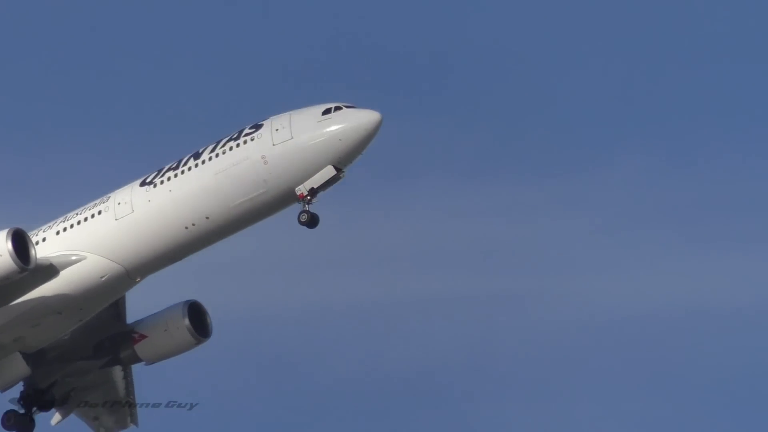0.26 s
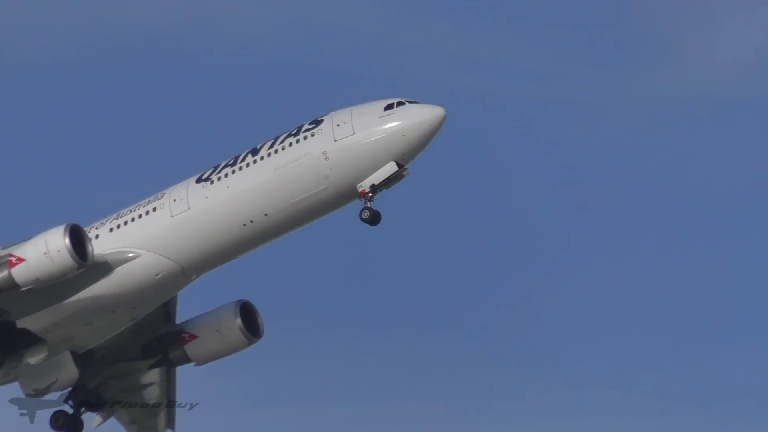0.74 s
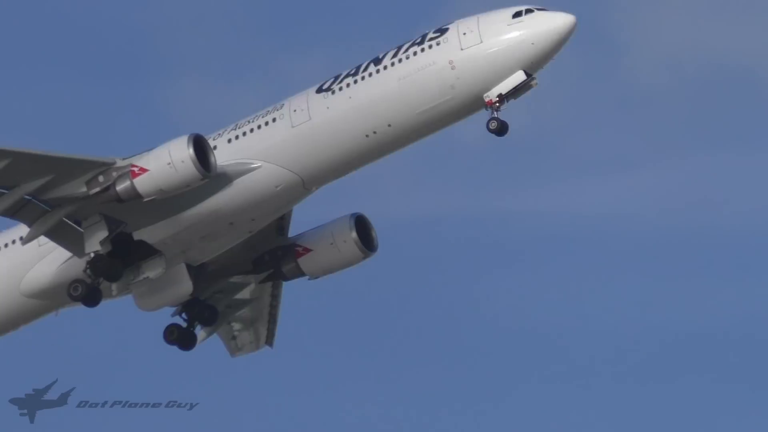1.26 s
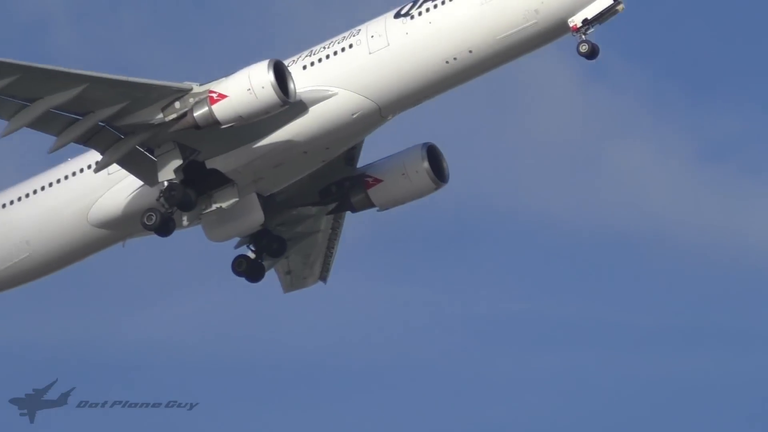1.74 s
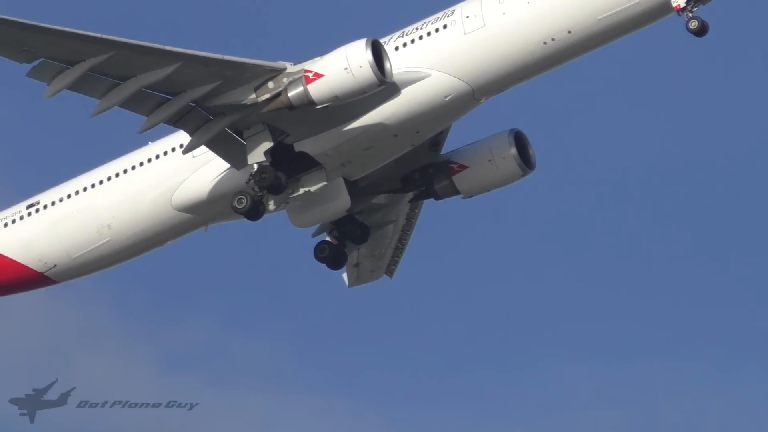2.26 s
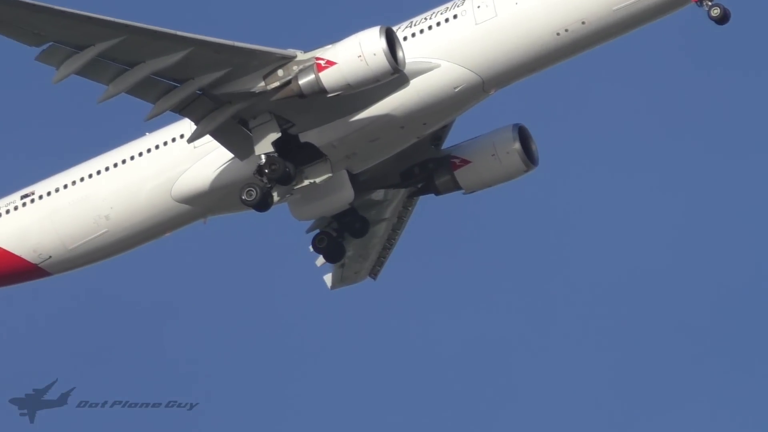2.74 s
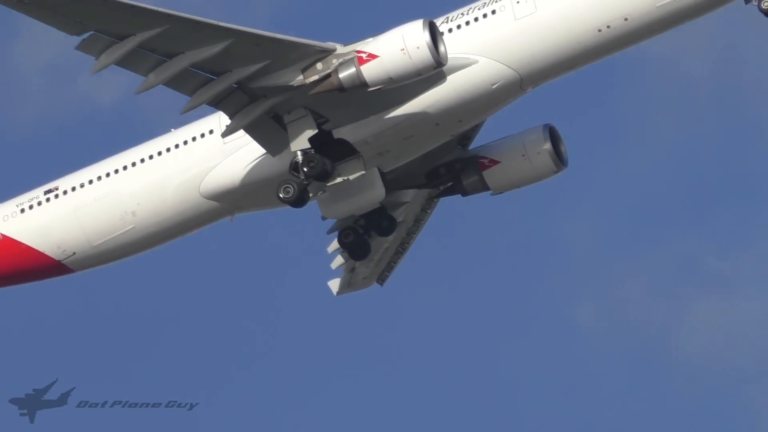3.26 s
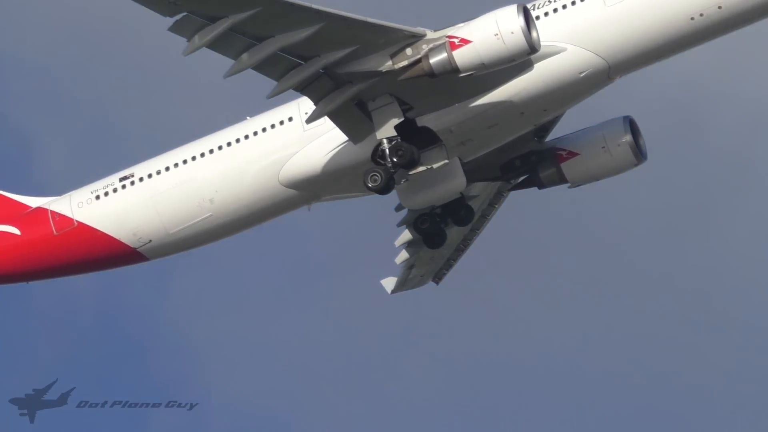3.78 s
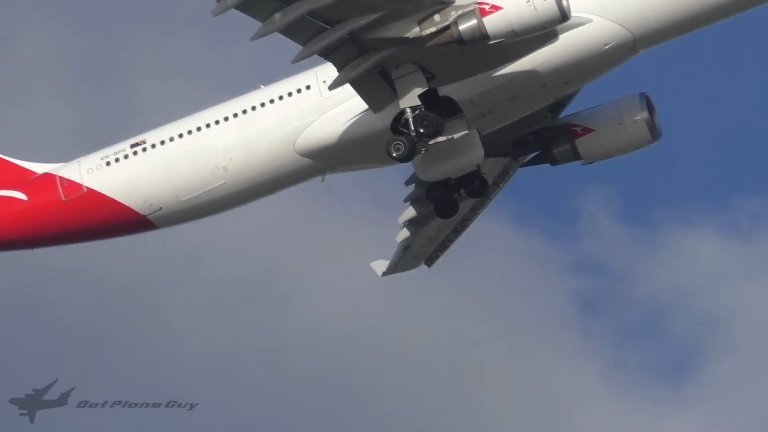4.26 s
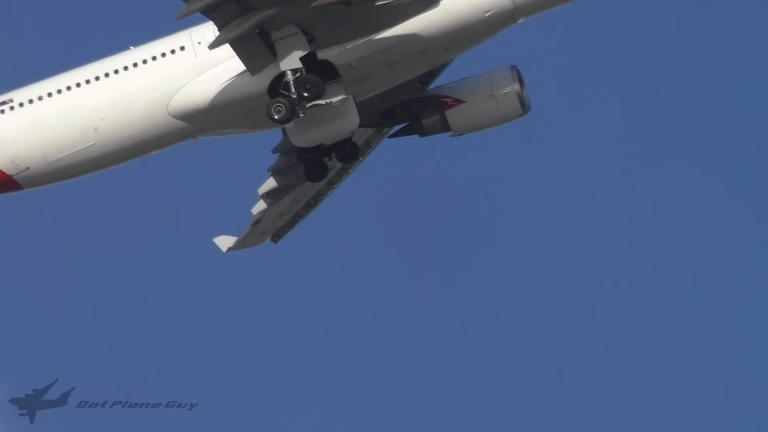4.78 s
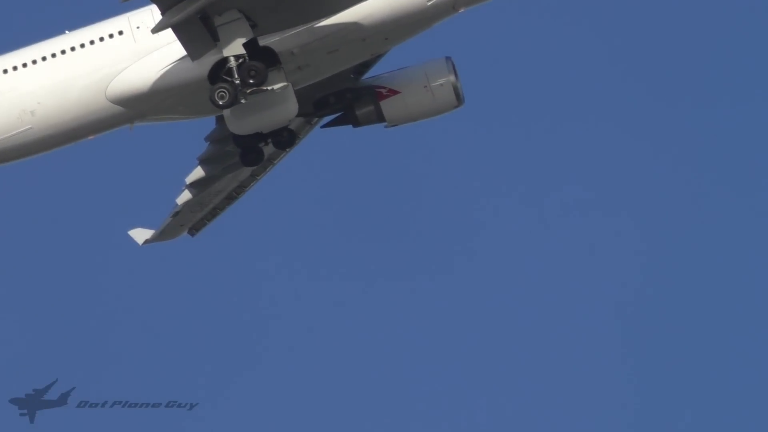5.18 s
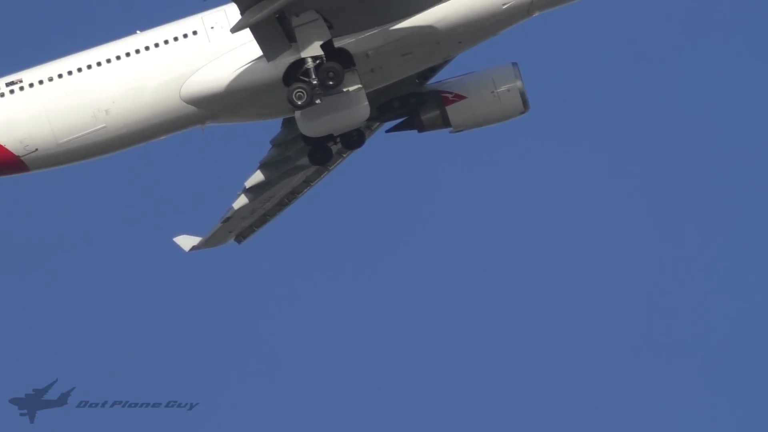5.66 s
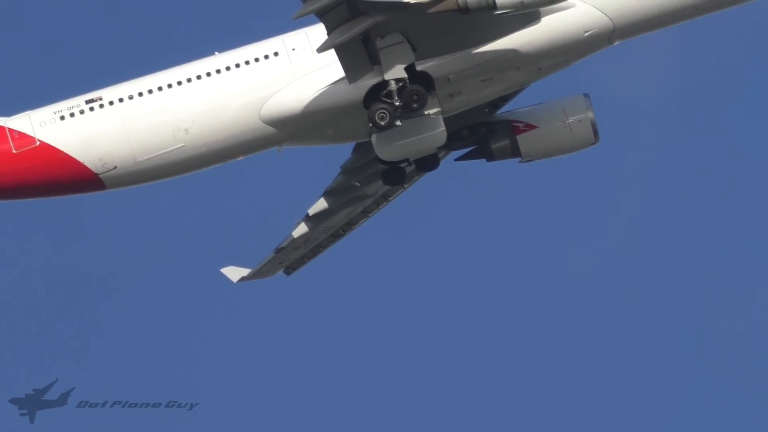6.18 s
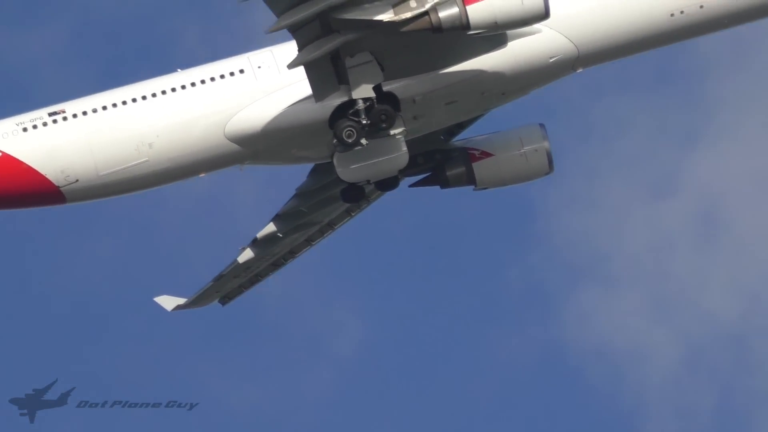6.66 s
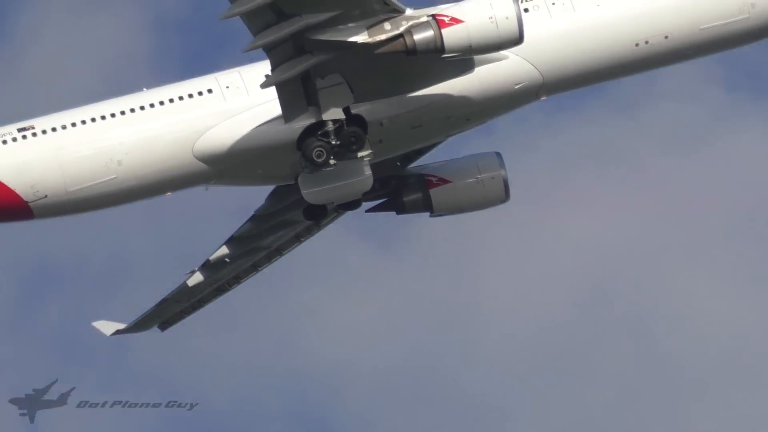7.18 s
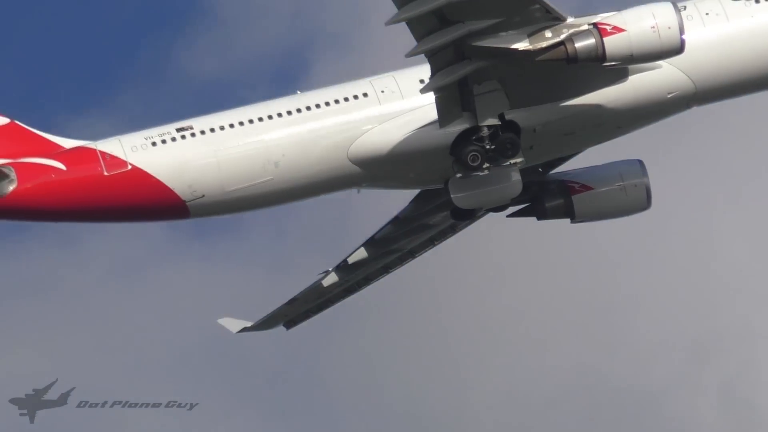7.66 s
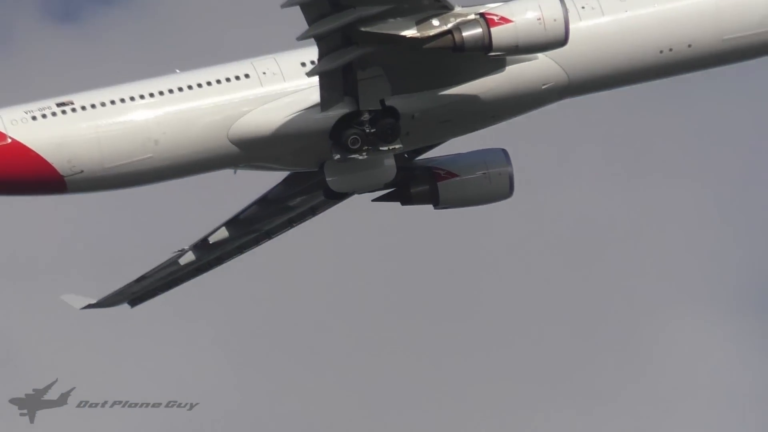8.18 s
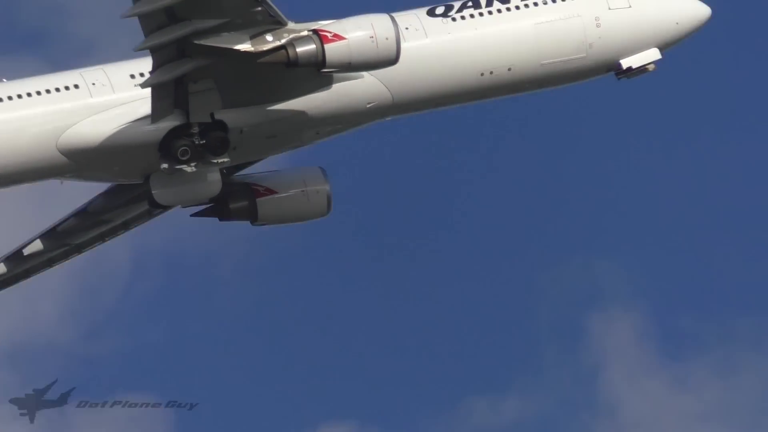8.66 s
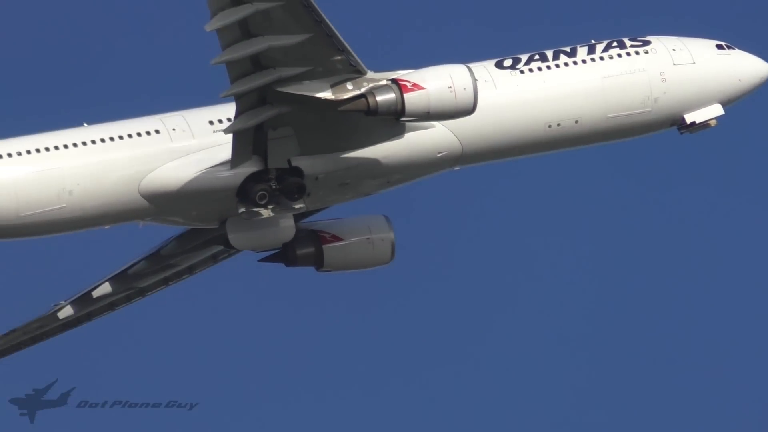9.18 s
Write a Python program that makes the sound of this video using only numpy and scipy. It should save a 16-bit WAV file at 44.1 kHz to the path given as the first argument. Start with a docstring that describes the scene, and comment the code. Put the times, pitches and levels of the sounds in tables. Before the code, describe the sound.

Loud continuous airliner roar outdoors, lumpy bass rumble at first, then rushing hiss and a flickering high whine that gradually drops.

```python
"""A twin-engined airliner climbs past a listener on an airfield, for 9.4 s.
At first plume rumble with a hollow note, jet roar and gusty hiss, all coloured noise, carry a blade tone
of paired sines near 2.4 kHz, a fainter tone above it and, until 3 s, a few ringing ticks nearby.
Then the blade tone sinks by Doppler shift, the hollow note drops and fades, and a lagging ground echo
combs the roar ever more finely as the aircraft rises. Late on, the octave of the blade tone shows."""
import sys
import numpy as np
from scipy import signal
from scipy.fft import rfft, irfft, next_fast_len
from scipy.io import wavfile
from scipy.ndimage import uniform_filter1d

SR = 44100
rng = np.random.default_rng(int(sys.argv[2]) if len(sys.argv) > 2 else 0)


def nominal_scale(level):
    """Amplitude ratio for a level in decibels (scalar or array-like)."""
    x = np.asarray(level, float) / 20
    return 10 ** x


def inscribe(sig):
    """Save sig as 16-bit PCM at rate SR to the path in sys.argv[1].

    A 1-D sig is mono; a 2-D sig holds one channel per row.
    Samples are clipped to [-1, 1] before scaling.
    """
    pcm = np.round(np.clip(np.atleast_2d(sig).T, -1, 1) * 32767)
    wavfile.write(sys.argv[1], SR, pcm.astype(np.int16))


N = 415863

# Source levels are ahead of the ground echo and the output stage.
# Plume. Each row: time in seconds, rumble level in dB, roar level in dB, rumble tilt in dB per pitch zone.
PLUME = [(0.02, -18, -19.5, 0), (0.31, -18.5, -18.5, 2.5), (.55, -19.5, -20.5, -1.3),
         (0.77, -25, -19.5, 1.2), (0.85, -13, -20, -2.5), (0.99, -21.5, -23, -0.5), (1.09, -17, -17.5, 2),
         (1.33, -14, -16, -0.5), (1.39, -24, -18, 3), (1.51, -11, -14.5, -1.6), (1.61, -25, -16, -.4),
         (1.72, -11.5, -15.5, -2), (1.82, -27, -15.5, 2), (1.95, -18, -18.5, -0.5), (2.11, -25, -21.5, -.8),
         (2.19, -14.5, -21.5, 0.5), (2.24, -22, -21, -1.3), (2.3, -19.5, -19.5, -0.1),
         (2.5, -20, -17, -0.1), (2.69, -22, -15.5, -2.5), (2.79, -26, -17, 1.3), (2.87, -17.5, -15.5, 1.5),
         (3.05, -16.5, -16.5, -2.4), (3.26, -19, -15, 2.5), (3.31, -19, -13.5, 0.5),
         (3.39, -22.5, -17.5, 0), (3.44, -15.5, -13.5, -0.8), (3.52, -25, -14.5, -2.5),
         (3.58, -17.5, -13, 0.3), (3.63, -33, -16, -.8), (3.7, -20, -15.5, -0.5),
         (3.81, -22.5, -17.5, -0.5), (4.1, -25.5, -16.5, 1), (4.38, -22, -17, -0.4), (4.44, -28, -16.5, 1),
         (4.6, -18, -19, -1), (4.88, -22, -18.5, -0.1), (5.2, -22.5, -16, 0.5), (5.55, -22.5, -16.5, 0),
         (5.65, -27.5, -15.5, -0.2), (5.8, -20.5, -18.5, -1.2), (6.05, -22.5, -16.5, 0.2),
         (6.2, -19, -19, 0.7), (6.6, -21, -17, 1.2), (6.95, -19, -17, .4), (7.1, -22, -18.5, -1),
         (7.25, -19.5, -15.5, 0), (7.7, -21, -17.5, 1.5), (8.1, -20, -17, 0.5), (8.5, -21, -17, 1.2),
         (8.8, -20, -18, 0.8), (9.15, -19, -18, 0), (9.41, -21, -20.5, 1)]
# Swells and lulls as eddies pass between aircraft and listener.
# Each row: time in seconds, then levels of body, hiss, upper hiss and treble in dB.
GUSTS = [(0.02, -23, -31.5, -39.5, -57), (.11, -23.5, -29.5, -41.5, -59.5), (0.28, -28.5, -36, -44.5, -61),
         (0.52, -23.5, -31.5, -39.5, -57), (0.77, -26.5, -33, -43.5, -58.5),
         (0.99, -30, -33.5, -37.5, -56.5), (1.1, -24.5, -30.5, -39.5, -56.5),
         (1.17, -25.5, -32, -39, -54.5), (1.28, -23.5, -30, -39.5, -54.5), (1.51, -27, -32, -40, -57),
         (1.64, -22, -27, -38, -54.5), (1.77, -27, -35.5, -44, -59), (2.0, -31, -36.5, -43.5, -59.5),
         (2.24, -29, -35.5, -42.5, -57), (2.37, -30.5, -33.5, -42.5, -55.5), (2.46, -29, -32, -38.5, -54.5),
         (2.53, -22.5, -28.5, -31.5, -49.5), (2.6, -20.5, -25.5, -34.5, -49), (2.7, -26, -28.5, -37, -52.5),
         (2.79, -26.5, -32, -40, -54), (2.93, -26, -33, -38.5, -52.5), (3.08, -28.5, -33.5, -39.5, -54),
         (3.37, -27, -31, -38, -52), (3.52, -26.5, -32, -38, -54), (3.65, -23.5, -31, -39.5, -55.5),
         (3.78, -26, -25, -33, -53), (3.86, -22, -30, -40, -51), (3.98, -24, -30, -40.5, -53.5),
         (4.06, -26.5, -34, -43, -56.5), (4.18, -27.5, -34.5, -43, -55), (4.28, -27, -30, -37.5, -51),
         (4.36, -27, -35, -41, -53.5), (4.59, -25, -31.5, -42, -54.5), (4.7, -25, -28.5, -37, -45.5),
         (4.78, -28.5, -33, -41.5, -53.5), (4.83, -24, -24, -35.5, -51), (4.88, -21.5, -30, -39, -50.5),
         (5.0, -22.5, -32, -37.5, -51.5), (5.17, -24, -29.5, -36.5, -49.5), (5.27, -29, -36.5, -40, -55),
         (5.3, -31, -33, -41, -53.5), (5.48, -27, -36.5, -43.5, -55.5), (5.54, -22.5, -31.5, -37.5, -49.5),
         (5.68, -24.5, -29, -35.5, -50), (5.82, -21.5, -26, -33.5, -45.5), (6.03, -26.5, -35, -41, -52.5),
         (6.35, -23.5, -32.5, -37.5, -49), (6.56, -29, -37.5, -43, -55), (6.61, -28.5, -31.5, -40.5, -51.5),
         (6.82, -28, -34.5, -36.5, -51), (6.92, -21, -32, -37, -50.5), (7.0, -24, -30, -38, -51),
         (7.11, -21, -25.5, -31, -45), (7.29, -25, -34.5, -42, -53), (7.37, -27, -34.5, -39.5, -52.5),
         (7.47, -27, -33, -33.5, -46), (7.58, -25, -27, -31, -45), (7.71, -24.5, -32.5, -40, -52),
         (7.84, -28.5, -38.5, -45, -57.5), (7.89, -27, -32.5, -32, -46.5), (7.97, -28.5, -34.5, -38, -48),
         (8.13, -28.5, -31.5, -40.5, -55), (8.23, -28.5, -34, -35.5, -46.5), (8.34, -30, -36.5, -44, -56.5),
         (8.44, -24.5, -34, -38.5, -49), (8.49, -23, -33, -42.5, -54.5), (8.55, -20.5, -27, -32.5, -44),
         (8.7, -25, -31.5, -37, -49.5), (8.81, -24.5, -31, -36, -44), (8.96, -27.5, -35.5, -40, -55.5),
         (9.09, -26, -32.5, -36.5, -48), (9.22, -25.5, -30, -37, -50), (9.36, -24.5, -34, -40, -50),
         (9.41, -26, -33.5, -35, -49)]
# Brightness of the roar. Each row: time in seconds, tilt in dB per pitch zone.
ROAR_TILT = [(0, 3), (.6, 1.3), (1.1, -0.4), (1.8, -0.5), (2.5, 0.3), (3.3, -1.7), (4, -0.3), (4.8, 0.5),
             (5.5, -0.6), (6.5, 0.2), (7.5, 0.3), (8.5, 0.8), (9.43, 2.8)]
# Hollow note in the rumble. Each row: time in seconds, centre in Hz, level in dB relative to the rumble noise.
HOLLOW_NOTE = [(0, 112.2, 3), (.4, 104.8, 1.5), (.9, 110, -1), (1.2, 98, 3.5), (1.7, 97, 6.5), (2.1, 85, 2),
               (2.4, 72, -2), (2.9, 72.05, 1), (3.4, 88.2, 9.5), (3.7, 72.6, -10.5), (4.7, 60, -7),
               (6.0, 60.06, -10.5), (9.43, 59.95, -21.5)]
# Noise colours, low to high. Each row: frequency in Hz, relative spectral level in dB.
RUMBLE_COLOUR = [(18, -20.5), (30, -20.5), (50, -5), (75, -0.5), (100, 4.5), (140, -4.5), (200, -35.5)]
ROAR_COLOUR = [(80, -27), (130, -1), (200, -0.5), (280, -2), (380, -4.5), (480, -8), (600, -12),
               (850, -26.5), (1300, -36.5)]
BODY_COLOUR = [(420, -10.5), (600, 1), (800, 0), (1000, 0.5), (1300, -2), (1600, -8), (2000, -29)]
HISS_COLOUR = [(1150, -11), (1500, 0), (1800, -1.5), (2100, -2.5), (2450, -3.5), (2900, -19)]
UPPER_HISS_COLOUR = [(2300, -16), (2650, 0), (3000, -1), (3300, -2.5), (3650, -5.5), (3850, -14),
                     (4600, -34.5)]
TREBLE_COLOUR = [(3300, -21.5), (3900, -0.5), (4800, -6), (5600, -12.5), (6500, -22), (7500, -35),
                 (8400, -41), (9500, -76)]
# Ground echo. Each row: time in seconds, lag in ms, share of the direct sound from 0 to 1.
GROUND_ECHO = [(0, 1.7, .25), (.5, 1.8, .22), (1.0, 2.05, .2), (1.6, 2.25, .22), (2.2, 2.27, .15),
               (3.2, 2.35, .14), (3.9, 2.45, .06), (4.4, 2.9, .25), (5.2, 3.05, .25), (5.8, 3.33, .28),
               (6.4, 3.5, .47), (7.0, 3.6, .47), (7.6, 3.85, .36), (8.2, 4.05, .5), (8.8, 4.1, .5),
               (9.43, 4.15, .52)]
# The pass. Each row: time in seconds, blade tone in Hz.
BLADE_PITCH = [(0, 2445), (.5, 2465), (1.2, 2460), (1.62, 2432), (2.45, 2418), (2.8, 2396), (3.8, 2342),
               (4.7, 2303), (5.8, 2243), (6.85, 2184), (7.45, 2162), (8.0, 2137), (8.7, 2096), (9.43, 2072)]
# Blade tone, coming and going with the eddies. Each row: time in seconds, level in dB.
BLADE_LEVEL = [(0, -50), (.09, -39), (.13, -39), (.19, -56), (.27, -41), (.33, -55), (.41, -39), (.46, -40),
               (.5, -52), (.53, -35), (.57, -33), (.61, -50), (.65, -42), (.72, -58), (.87, -46),
               (.93, -57), (1.04, -47), (1.1, -40), (1.14, -54), (1.2, -36), (1.26, -43), (1.32, -38),
               (1.38, -52), (1.44, -39), (1.5, -53), (1.6, -36), (1.64, -45), (1.68, -39), (1.73, -57),
               (1.87, -46), (1.93, -58), (2.0, -47), (2.1, -57), (2.3, -54), (2.37, -40), (2.44, -37),
               (2.48, -31), (2.51, -38), (2.54, -34), (2.57, -50), (2.64, -36), (2.75, -47), (2.98, -41),
               (3.2, -48), (3.28, -41), (3.33, -52), (3.62, -52), (3.7, -41), (3.8, -48), (3.97, -40),
               (4.03, -52), (4.5, -47), (4.6, -43), (4.77, -45), (4.83, -33), (4.87, -50), (5.6, -50),
               (5.7, -43), (5.75, -35), (5.8, -42), (5.88, -42), (5.96, -52), (6.25, -50), (6.33, -43),
               (6.42, -53), (6.57, -52), (6.63, -38), (6.69, -50), (6.75, -40), (6.84, -39), (6.9, -35),
               (6.95, -38), (6.99, -54), (7.03, -35), (7.11, -32), (7.15, -37), (7.19, -34), (7.23, -35),
               (7.27, -50), (7.32, -37), (7.37, -54), (7.41, -36), (7.47, -36), (7.53, -43), (7.56, -34),
               (7.6, -38), (7.63, -50), (7.82, -46), (7.87, -37), (7.95, -35), (7.99, -50), (8.03, -39),
               (8.07, -37), (8.11, -49), (8.35, -43), (8.45, -50), (8.58, -38), (8.63, -44), (8.83, -39),
               (8.93, -52), (9.07, -42), (9.25, -47), (9.35, -40), (9.43, -46)]
# Fainter tone just above the blade tone, shows early. Each row: time in seconds, level in dB.
UPPER_TONE = [(0, -56), (.95, -55), (1.1, -43), (1.16, -52), (1.25, -43), (1.4, -53), (1.56, -40),
              (1.66, -58), (2.33, -60), (2.4, -44), (2.52, -42), (2.58, -54), (9.43, -64)]
# Octave of the blade tone, shows late. Each row: time in seconds, level in dB relative to the blade tone.
OCTAVE = [(0, -45), (7.4, -36), (8.3, -20), (8.8, -18), (9.43, -21)]
# Nearby ticks. Each row: start in seconds, level in dB at the start of the decay, pitch in Hz.
TICKS = [(0.31, -50.5, 6100), (.85, -64, 7750), (.92, -60, 7880), (1.324, -57.5, 8000),
         (2.245, -67.5, 7960), (2.823, -44, 6050), (2.832, -49, 6300)]

HOLLOW_CORNER_HZ = 22
USUAL_BODY_DB, ROAR_DB_PER_BODY_DB = -24, 0.29
CLEAR_AIR_DB = -18.5   # usual treble over hiss; above it the air is clearer
ECHO_CUT_HZ, SOIL_CUT_HZ, SOIL_SHARE = 1500, 70, 0.52
ENGINE_GAP_HZ, FAR_ENGINE_DB = 9.7, -12
UPPER_TONE_GAP_HZ = 143
WAVER_HZ, FLUTTER_DB, OCTAVE_FLUTTER_DB = 14, 2.0, 9.5
TICK_T60_S = 0.013
FADE_IN_S = 0.004


def rms_one(x):
    """Scale to unit power."""
    return x / np.sqrt(np.mean(x ** 2) + 1e-20)


def in_time(rows):
    """Columns of a table, interpolated sample by sample."""
    s, *columns = np.transpose(rows)
    return [np.interp(np.arange(N) / SR, s, c) for c in columns]


def drift(corner_hz):
    """Slow chance of spread 1: noise at SR / 40 through a double one-pole low-pass."""
    pole = np.exp(-2 * np.pi * corner_hz * 40 / SR)
    noise = rng.standard_normal(N // 40 + 2002)
    slow = signal.lfilter([1], [1, -2 * pole, pole ** 2], noise)[2000:]   # settled part
    return np.interp(np.arange(N) / 40, np.arange(len(slow)), rms_one(slow))


def low_pass(x, cut_hz):
    """One pole, already settled at the first sample."""
    b, a = signal.butter(1, cut_hz, fs=SR)
    return signal.lfilter(b, a, x, zi=signal.lfilter_zi(b, a) * x[0])[0]


def turbulence(colour, shared_db, tilt_db, patchy_db, corner_hz):
    """Unit-power coloured noise; it flickers as a whole, tilts, and flickers zone by zone in pitch."""
    size = next_fast_len(N)
    log_hz = np.log(np.arange(size // 2 + 1) * SR / size + 1)
    hz, db = np.transpose(colour)
    shape = nominal_scale(np.interp(log_hz, np.log(hz), db, left=-120, right=-120))
    coloured = rfft(rng.standard_normal(size)) * shape
    centres = np.linspace(np.log(hz[0]), np.log(hz[-1]), num=5)
    out = 0
    for k, zone in enumerate(np.eye(len(centres))):   # overlapping zones that sum to one
        band = irfft(coloured * np.interp(log_hz, centres, zone), size)[:N]
        zone_db = patchy_db * drift(corner_hz) + tilt_db * max(k - 1, 0)   # tilt starts at the third zone
        out = out + band * nominal_scale(zone_db)
    return rms_one(out * nominal_scale(shared_db))


def plume_rumble(level_db, tilt_db):
    """Low exhaust noise plus its hollow note, brought back to the power of the noise alone."""
    hollow_hz, hollow_db = in_time(HOLLOW_NOTE)
    noise = turbulence(RUMBLE_COLOUR, 0, tilt_db, patchy_db=-0.5, corner_hz=4.0)
    rumble = noise + nominal_scale(hollow_db) * hollow_note(hollow_hz)
    return nominal_scale(level_db) * rumble / np.sqrt(1 + nominal_scale(2 * hollow_db))


def hollow_note(hz):
    """A narrow band of noise around a gliding centre: two slow drifts on carriers in quadrature."""
    turn = 2 * np.pi * np.cumsum(hz) / SR
    return rms_one(drift(HOLLOW_CORNER_HZ) * np.cos(turn) + drift(HOLLOW_CORNER_HZ) * np.sin(turn))


def jet_roar(level_db, body_db, flicker):
    """Mid-low jet noise that partly follows the swells of the body."""
    tilt_db, = in_time(ROAR_TILT)
    swell_db = ROAR_DB_PER_BODY_DB * (body_db - USUAL_BODY_DB)
    noise = turbulence(ROAR_COLOUR, 0.17 * flicker, tilt_db, patchy_db=0.08, corner_hz=0.74)
    return nominal_scale(level_db + swell_db) * noise


def gusty_hiss(body_db, hiss_db, upper_hiss_db, treble_db, flicker):
    """Jet and fan noise in four bands through gusty air; clear air dulls the highs less."""
    clear_db = uniform_filter1d(treble_db - hiss_db - CLEAR_AIR_DB, size=SR // 16)
    body = turbulence(BODY_COLOUR, 0.41 * flicker, 0, patchy_db=0.82, corner_hz=5.5)
    hiss = turbulence(HISS_COLOUR, 0.6 * flicker, 0, patchy_db=1.0, corner_hz=3.6)
    upper_hiss = turbulence(UPPER_HISS_COLOUR, 0.6 * flicker, 0, patchy_db=0.7, corner_hz=5.0)
    treble = turbulence(TREBLE_COLOUR, 0.66 * flicker, 0.16 * clear_db, patchy_db=1.0, corner_hz=6.9)
    return (nominal_scale(body_db) * body + nominal_scale(hiss_db) * hiss
            + nominal_scale(upper_hiss_db) * upper_hiss + nominal_scale(treble_db) * treble)


def jet_noise():
    """Rumble, roar and hiss; small eddies near the listener shake all but the rumble together."""
    rumble_db, roar_db, rumble_tilt_db = in_time(PLUME)
    body_db, hiss_db, upper_hiss_db, treble_db = in_time(GUSTS)
    flicker = drift(12.0)
    return (plume_rumble(rumble_db, rumble_tilt_db)
            + jet_roar(roar_db, body_db, flicker)
            + gusty_hiss(body_db, hiss_db, upper_hiss_db, treble_db, flicker))


def ground_echo(x):
    """Adds a later copy, its treble scattered by grass and eddies, its bass returned by soft soil."""
    lag_ms, share = in_time(GROUND_ECHO)
    lag_samples = (lag_ms + 0.047 * drift(1.8)) * SR / 1000
    dull = low_pass(low_pass(x, ECHO_CUT_HZ)[::-1], ECHO_CUT_HZ)[::-1]   # both ways: one lag for all pitches
    deep = low_pass(x, SOIL_CUT_HZ)
    share = np.clip(share, 0, 1)
    returned = share * dull + SOIL_SHARE * deep
    late = np.interp(np.arange(N) - lag_samples, np.arange(N), returned)
    return (x + late) / np.sqrt(1 + share ** 2)


def blade_tone(hz, flutter_db):
    """Two fans at slightly unequal speed, the far one half hidden; eddies blur pitch and level."""
    out = 0
    for gap_hz, level_db in ((0, 0), (ENGINE_GAP_HZ, FAR_ENGINE_DB)):
        pitch_hz = hz + gap_hz + WAVER_HZ * drift(40)
        level = nominal_scale(level_db + flutter_db * drift(35.0))
        out = out + level * np.sin(2 * np.pi * np.cumsum(pitch_hz) / SR)
    return rms_one(out)


def fan_tones():
    """Blade tone on its Doppler glide, the fainter tone above it, and its octave."""
    blade_hz, = in_time(BLADE_PITCH)
    blade_db, = in_time(BLADE_LEVEL)
    upper_db, = in_time(UPPER_TONE)
    octave_db, = in_time(OCTAVE)
    return (nominal_scale(blade_db) * blade_tone(blade_hz, FLUTTER_DB)
            + nominal_scale(upper_db) * blade_tone(blade_hz + UPPER_TONE_GAP_HZ, FLUTTER_DB)
            + nominal_scale(blade_db + octave_db) * blade_tone(2 * blade_hz, OCTAVE_FLUTTER_DB))


def ticks():
    """Very short high rings: decaying sines with a 0.5 ms onset."""
    out, t = np.zeros(N + SR), np.arange(SR // 20) / SR
    onset = np.minimum(t * 2000, 1)
    for s, db, hz in TICKS:
        start = int(s * SR)
        out[start:start + len(t)] += nominal_scale(db - 60 * t / TICK_T60_S) * np.sin(2 * np.pi * hz * t) * onset
    return out[:N]


def scene():
    """Jet noise with its ground echo, the fan tones above it, and a few ticks nearby."""
    return (ground_echo(jet_noise()) + fan_tones() + ticks())[None]


def top_cut(x):
    """Nothing passes above the cut-off."""
    return signal.sosfilt(signal.butter(12, 8360, fs=SR, output="sos"), x)


def record(dry):
    """Rounds the peaks a little, with a slight gain, and fades in very briefly."""
    rounded = 1.362 * np.tanh(dry / 1.26)
    fade_in = np.minimum(np.arange(N) / SR / FADE_IN_S, 1)
    return top_cut(rounded * fade_in)


dry = scene()
out = record(dry)
inscribe(out)
```